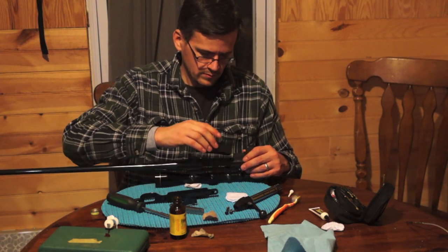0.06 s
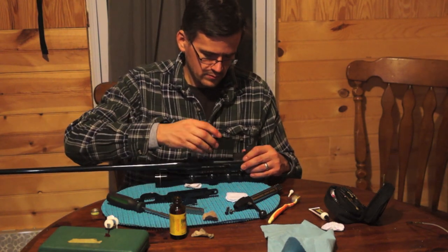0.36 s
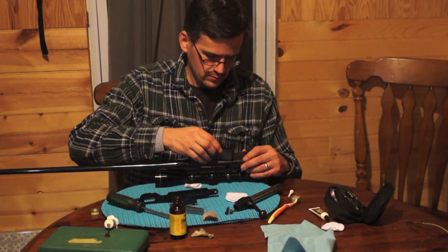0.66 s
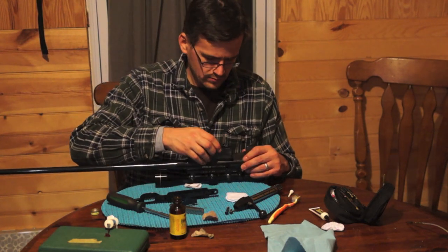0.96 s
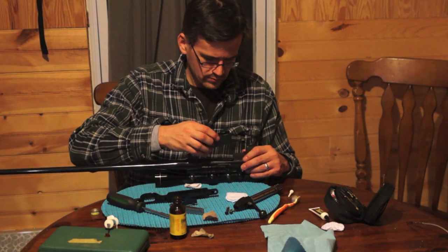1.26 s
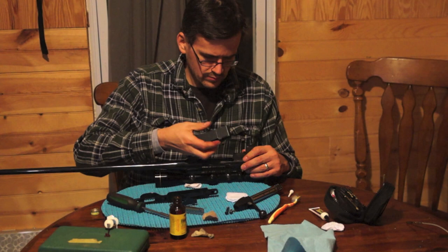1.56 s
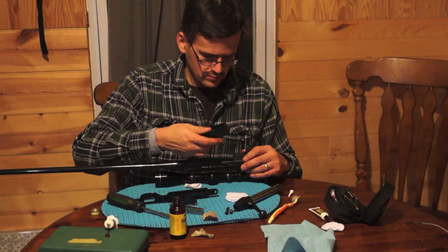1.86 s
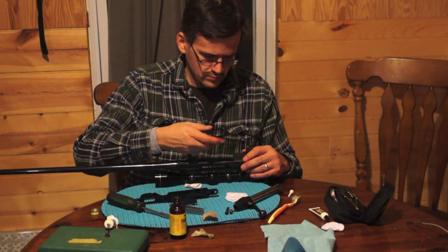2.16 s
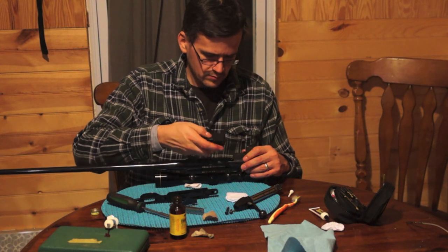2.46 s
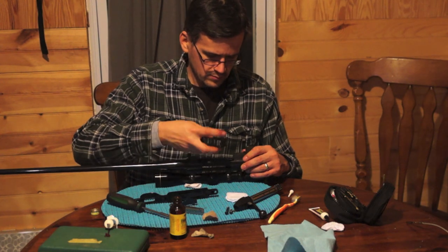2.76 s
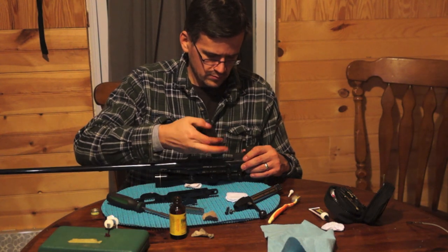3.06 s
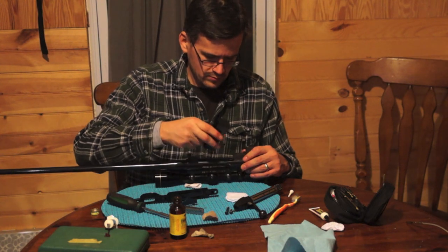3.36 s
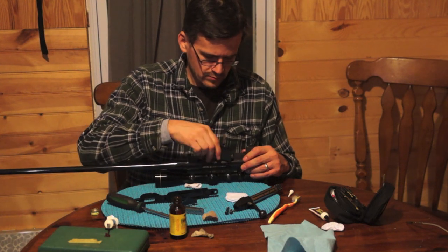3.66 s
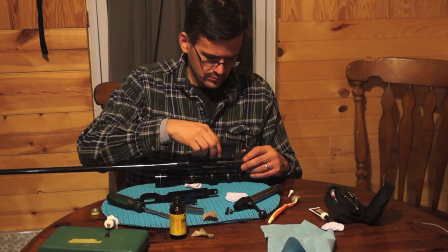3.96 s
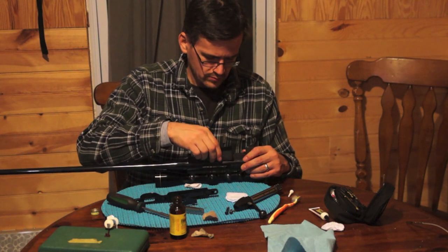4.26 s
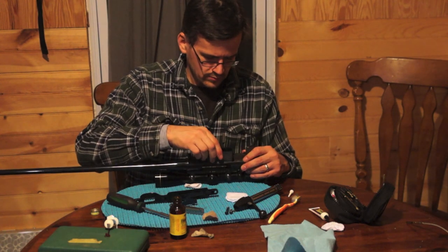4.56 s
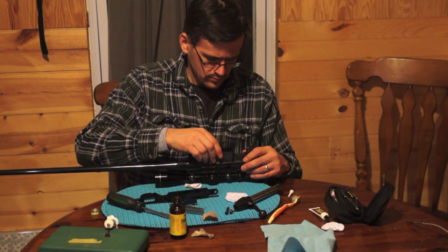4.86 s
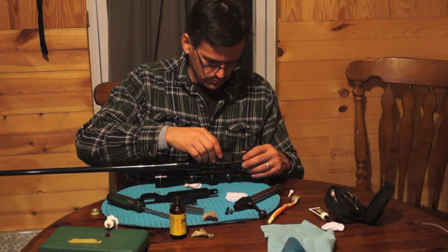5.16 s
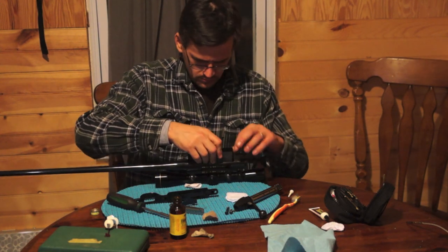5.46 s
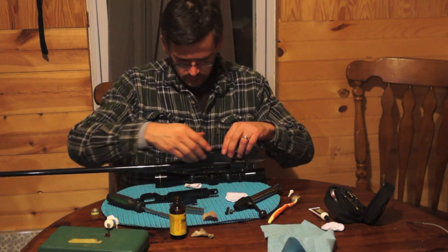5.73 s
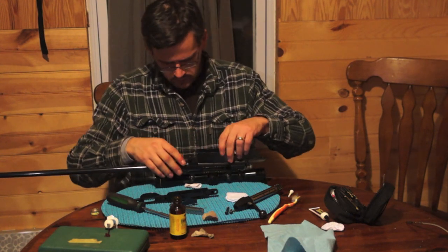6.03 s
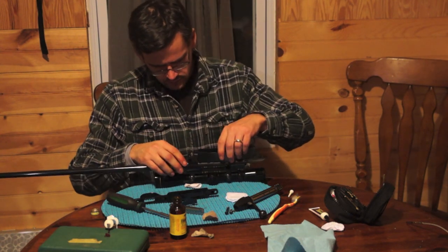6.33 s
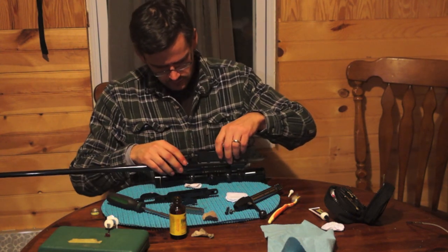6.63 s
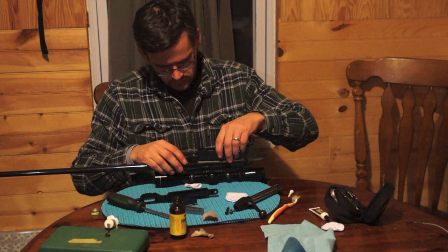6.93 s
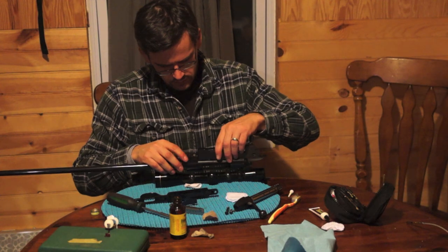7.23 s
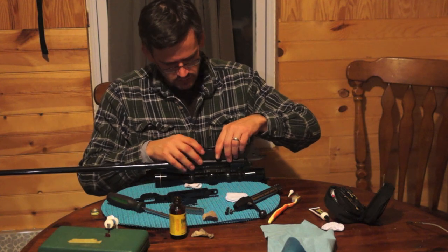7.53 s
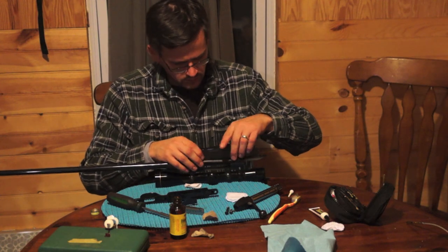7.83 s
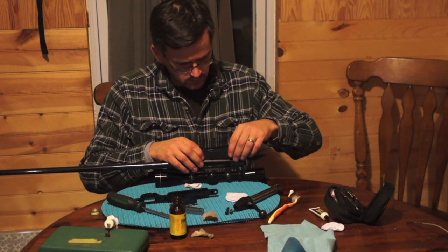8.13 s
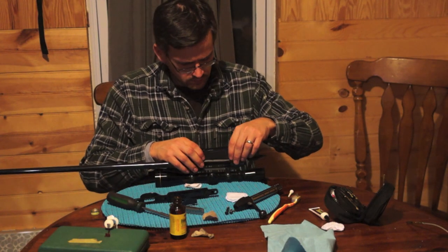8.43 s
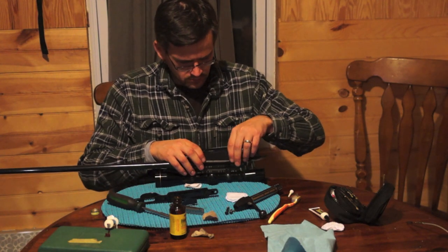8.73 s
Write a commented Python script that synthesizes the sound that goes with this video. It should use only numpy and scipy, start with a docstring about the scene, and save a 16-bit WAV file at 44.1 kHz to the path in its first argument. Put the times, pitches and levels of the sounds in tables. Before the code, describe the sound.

Small steel gun parts are handled and pressed into place, each contact clicking with a brief metallic ring. After an early click and some delicate rasps come the loudest clacks and a scrape, then scattered ticks, a bright snap and a final scrape and click. Shirt sleeves rustle softly in the later half. The sound is heard in stereo from a metre or two, in a small wooden room with low hum and hiss.

```python
"""Assembling a rifle at a table

Steel parts are fitted together in a small wood-panelled room. Each contact is a chatter of tiny
impacts that rings the receiver, carrier, catch or cover and rebounds once: light ones knock, hard
ones clack. A loose part slides in the fingers, steel scrapes home and flannel sleeves rustle.
A stereo microphone a metre or two away hears the walls answer, an appliance hum and its own hiss."""
import sys
import numpy as np
from scipy import signal
from scipy.fft import rfft, irfft
from scipy.io import wavfile

SR = 44100
rng = np.random.default_rng(int(sys.argv[2]) if len(sys.argv) > 2 else 0)


def waveform_to_disk(signal):
    """Save audio, clipped to [-1, 1], as 16-bit WAV at the path in sys.argv[1]."""
    frames = np.transpose(np.atleast_2d(signal))
    scaled = np.clip(frames, -1, 1) * 32767
    samples = np.round(scaled).astype(np.int16)
    wavfile.write(sys.argv[1], SR, samples)


N = 392225


def undb(db):
    """Decibels to gain."""
    return 10 ** (np.asarray(db) / 20)


def unit(x):
    """Scale to rms 1."""
    return x / np.sqrt(np.mean(x ** 2) + 1e-30)


def attack_rms(x):
    """Strength of the first 12 ms."""
    return np.sqrt(np.mean(x[:int(.012 * SR)] ** 2))


def freqs(x):
    """Frequency of each spectral bin of x, at least 1 Hz."""
    return np.maximum(np.fft.rfftfreq(x.shape[-1], 1 / SR), 1)


def lookup(points, hz):
    """Read (freq_hz, value) points on a log-frequency axis."""
    point_hz, value = np.transpose(points)
    return np.interp(np.log(hz), np.log(point_hz), value)


def colour(x, points):
    """Equalise x with a curve of (freq_hz, gain_db) points."""
    return irfft(rfft(x) * undb(lookup(points, freqs(x))), x.shape[-1])


def cut(x, hz, kind):
    """Causal Butterworth filter."""
    return signal.sosfilt(signal.butter(4, hz, kind, fs=SR, output="sos"), x)


def add(track, start_s, x):
    """Mix x into the track at start_s."""
    i = int(start_s * SR)
    track[i:i + len(x)] += x[:len(track) - i]


def wander(rate_hz):
    """Random drift with rms 1."""
    return unit(np.interp(np.arange(N) / SR * rate_hz, np.arange(1024), rng.standard_normal(1024)))


def decay(t, t60_s):
    """Envelope that falls 60 dB in t60_s."""
    return np.exp(-np.log(1000) * t / t60_s)


def grit(samples, grain_db):
    """Grainy noise: each sample has its own random level."""
    return rng.standard_normal(samples) * undb(grain_db * rng.standard_normal(samples))


def room_tone(air_mid_db=-57, air_side_db=-56, hum_side_db=-9):
    """Room air and microphone hiss, with the low hum of a running appliance."""
    # colour of the air and hiss, mid and side: freq_hz, gain_db
    air_mid = [(12, -52), (20, -19.5), (129, -5), (185, -6), (232, -3), (315, -11), (352, -10), (393, -11),
               (491, -13.5), (581, -14), (811, -16.5), (1010, -17.5), (2470, -21.5), (6360, -25),
               (15500, -30)]
    air_side = [(12, -58), (20, -28), (49, -30), (70, -23), (133, -19), (191, -9.5), (274, -5.5),
                (382, -2.5), (452, -4), (549, -1), (1770, -8), (6360, -20), (15500, -26)]
    # the appliance's narrow resonances: centre_hz, width_hz, level_db
    hum_bands = [(117, 7.4, -81.5), (144, 1.7, -74), (229, 17, -67.5), (252.2, 18, -71.5), (352.7, 17, -72)]
    mid = undb(air_mid_db) * unit(colour(rng.standard_normal(N), air_mid))
    side = undb(air_side_db) * unit(colour(rng.standard_normal(N), air_side))
    for centre_hz, width_hz, level_db in hum_bands:
        resonance = 1 / (1 + (2 * (freqs(mid) - centre_hz) / width_hz) ** 2)
        hum = undb(level_db) * unit(irfft(rfft(rng.standard_normal((2, N))) * resonance, N))
        mid += hum[0]
        side += undb(hum_side_db) * hum[1]
    return np.array([mid + side, mid - side])


def sleeves(rest_db=-69.5, swell_s=0.29):
    """Flannel rustles unevenly and swells with each move of the arms."""
    # colour of soft flannel: freq_hz, gain_db
    flannel = [(40, -19), (150, -2), (400, -3.5), (1000, -10.5), (3000, -23), (12000, -40)]
    # moves of the arms: peak_s, level_db
    arm_moves = [(4.5, -72), (5.75, -61), (7.2, -61.5), (7.9, -62.5), (8.5, -64.5)]
    t = np.arange(N) / SR
    swells = sum(undb(db) ** 2 * np.exp(-((t - peak_s) / swell_s) ** 2) for peak_s, db in arm_moves)
    rustle = unit(colour(rng.standard_normal((2, N)), flannel))
    return rustle * np.sqrt(undb(rest_db) ** 2 + swells) * undb(wander(12))


def ring(modes, t, scatter_db=0.9):
    """Decaying modes; every blow lands on another spot and weights them anew."""
    pitch_hz, gain_db, t60_s = np.transpose(modes)[:, :, None]
    gain = undb(gain_db + scatter_db * rng.standard_normal(pitch_hz.shape))
    phase = rng.random(pitch_hz.shape)
    return np.sum(gain * np.sin(2 * np.pi * (pitch_hz * t + phase)) * decay(t, t60_s), axis=0)


def finger_slides(slide_s=0.044, grain_db=5, rasp_db=-4):
    """Skin slips over a loose steel part, rasping and making it sing faintly."""
    # shifts in the fingers: start_s, level_db
    slides = [(1.622, -68), (2.21, -62), (2.38, -68), (2.586, -64.5), (2.74, -70), (2.975, -68)]
    # the loose part's modes: pitch_hz, gain_db, t60_s
    loose_modes = [(6190, 0, .08), (6850, -0.5, 0.1), (8030, -2, .1), (8950, 2, 0.07), (9500, 2, 0.051),
                   (10200, -5, .1), (10750, -6, .1), (11300, 0, 0.097), (12900, -1, 0.1)]
    out, t = np.zeros(N), np.arange(SR // 3) / SR
    stroke = np.sin(np.pi * np.minimum(t / slide_s, 1))
    length_gain = np.sqrt(slide_s / t[-1])  # sets the level over the stroke's length
    for start_s, level_db in slides:
        slips = grit(len(t), grain_db) * stroke
        singing = unit(signal.fftconvolve(slips, ring(loose_modes, t))[:len(t)])
        rasp = undb(rasp_db) * unit(cut(slips, 4000, "highpass"))
        add(out, start_s, undb(level_db) * length_gain * (singing + rasp))
    return out


def light_touches():
    """Each light touch wakes a single resonance: a faint ping."""
    # pings: start_s, pitch_hz, level_db, t60_s
    touches = [(1.51, 924, -61.5, 0.72), (1.595, 3230, -57, 0.078), (1.642, 4215, -59, .09),
               (2.236, 1450, -52.5, 0.05), (3.868, 6220, -57, 0.05), (6.598, 1090, -44.5, 0.067),
               (8.489, 715, -47.5, 0.052)]
    out, t = np.zeros(N), np.arange(SR // 3) / SR
    for start_s, pitch_hz, level_db, t60_s in touches:
        add(out, start_s, undb(level_db) * np.sin(2 * np.pi * pitch_hz * t) * decay(t, t60_s))
    return out


def scrape(trim_db=-5, grain_db=6, snag_db=3):
    """Dense stick-slip as steel drags along its seat; each push swells and fades."""
    # colour of dragging steel: freq_hz, gain_db
    drag_colour = [(200, -31), (700, 1), (1200, -2), (1750, 11), (2400, 3), (2900, 4), (4200, -1),
                   (7000, -4), (15000, -24)]
    # pushes home: start_s, length_s, level_db (before the trim)
    pushes = [(4.42, 0.071, -65), (4.54, 0.26, -52.5), (6.8, 0.08, -62), (7.362, 0.025, -52),
              (7.656, 0.046, -63), (8.749, 0.067, -47)]
    slips = unit(colour(grit(N, grain_db), drag_colour))
    pressure = np.zeros(N)
    for start_s, length_s, level_db in pushes:
        add(pressure, start_s, undb(level_db) * np.sqrt(np.hanning(int(length_s * SR))))
    return undb(trim_db) * slips * pressure * undb(snag_db * wander(110))


def contact(part, clack_db, ring_db, knock_db, tick_db, chatter_s,
            grain_db=5, body_db=-18, body_s=0.012, knock_hz=2200, tick_hz=5600):
    """Steel meets steel: tiny impacts die away, the gun's body and the struck part ring on."""
    # dense, quickly damped response of the whole gun: freq_hz, gain_db
    gun_body = [(100, -6), (300, -7.5), (500, -4), (700, -4.5), (1000, -0.5), (1400, -3), (2000, -3),
                (3300, 3), (4300, 4.5), (5600, -6.5), (8000, 2), (10000, -1), (12000, -9), (16000, -18)]
    # modes of each part, by name: pitch_hz, gain_db, t60_s
    part_modes = { "receiver": [(1745, -18.5, 0.22), (1978, -14.5, 0.16), (2362, -22.5, 0.17),
                  (2920, -35, .13), (3624, 7, 0.04), (3584, 4, 0.06), (3820, -3, 0.039), (4043, -2, 0.035),
                  (4200, -2, 0.041), (5140, -36, 0.11), (6224, -8, 0.045), (6220, -5, 0.11),
                  (6630, -12, .06), (7850, -10, 0.091), (7860, -14, 0.084), (8689, -9, 0.087),
                  (9810, -9.5, 0.083), (10000, -15, 0.09), (12630, -30, .07)], "carrier": [(1965, -8, .15),
                  (2160, -4, .07), (2420, -27, .07), (2820, -16, 0.085), (3190, -4, 0.047),
                  (4160, 11, 0.025), (4100, -3, 0.062), (4170, -2, 0.084), (4660, 2, 0.07),
                  (6130, -1, 0.057), (6300, 5, .09), (6870, 2, .07), (7860, 5, 0.082), (11830, 2, 0.081)],
                  "catch": [(373, -10.5, 0.03), (990, -10.5, 0.03), (2750, -9.5, 0.046), (3056, -9, 0.066),
                  (3540, -1.5, 0.035), (4520, -9, .1), (4626, -9, 0.088), (4660, 2.5, 0.057),
                  (4930, -4, .1), (6300, -1.5, 0.068), (6450, -9, 0.11), (8140, -24, 0.055),
                  (10580, -10, 0.046), (12700, -7, .025), (14700, -7, .01)], "cover": [(1050, -4, 0.048),
                  (1642, -5.5, 0.054), (1803, -9, 0.037), (2100, -17, 0.066), (2330, -20, 0.06),
                  (2890, -4, 0.027), (3138, 1, 0.025), (3273, 4.5, 0.03), (3424, -1, 0.041),
                  (4220, -5.5, .04), (4400, -21, 0.036), (5360, -4.5, 0.056), (6600, 4.5, 0.047),
                  (8120, -6, .05)]}
    t = np.arange(SR // 3) / SR
    impacts = rng.standard_normal(len(t)) * undb(grain_db * np.clip(rng.standard_normal(len(t)), -2, 2))
    envelope = np.exp(-t / chatter_s) + undb(body_db) * np.exp(-t / body_s)
    crack = colour(impacts * envelope, gun_body) * (1 - t / t[-1])
    tone = ring(part_modes[part], t)
    attack = 1 - np.exp(-t / (0.49 * chatter_s))
    hit = (crack / attack_rms(crack) + undb(ring_db) * tone / attack_rms(tone)) * attack
    # a heavy push knocks, a sharp edge ticks; both are set against the clack
    knock = cut(hit, knock_hz, "lowpass")
    clack = cut(hit, [knock_hz, tick_hz], "bandpass")
    tick = cut(hit, tick_hz, "highpass")
    bands = (knock, knock_db), (clack, 0), (tick, tick_db)
    balanced = sum(undb(clack_db + db) * band / attack_rms(band) for band, db in bands)
    return cut(balanced, 155, "highpass")  # small parts radiate no bass


def seating_parts(trim_db=-3, middling_db=-46, loose_s=0.0021, rebound_s=0.0075, seat_damping_db=10):
    """Parts click into place and rebound once; a longer chatter means a looser fit."""
    # contacts, often a lead-in tick and then the seating blow: start_s, part, clack_db (before the
    # trim), ring_db (against the crack), tick_db (against the clack), chatter_s
    contacts = [ (1.2694, "carrier", -43.5, -16, -16, 0.0045), (1.2958, "carrier", -33.5, -3, -7, 0.0017),
                (1.642, "carrier", -67, -8, -12, .003), (4.2171, "receiver", -30, 5.5, -15.5, 0.00026),
                (4.2434, "receiver", -25, -1.5, -3, 0.0011), (4.313, "cover", -48, 7, -8, 0.0012),
                (4.422, "receiver", -48.5, -1, -5.5, 0.0029), (4.5248, "receiver", -41, 6, -5.5, 0.00098),
                (4.542, "receiver", -36, -2, -7, 0.0016), (4.6807, "receiver", -47.5, -4, -2.5, .0018),
                (4.7018, "cover", -41.5, -10.5, -6.5, 0.0035), (4.8125, "cover", -54, -6, -11, .0007),
                (4.893, "cover", -33.5, -7.5, -9, 0.003), (5.598, "receiver", -50, -4, -15, 0.0037),
                (5.802, "cover", -49, -13, -8, .0011), (6.219, "receiver", -58.5, -9, -5, .0013),
                (6.2504, "cover", -57.5, -10, -15, 0.0056), (6.597, "carrier", -49.5, -2, -5.5, .0021),
                (6.7077, "carrier", -46, -8.5, -11.5, 0.0044), (7.089, "carrier", -58.5, -15, -9, 0.0048),
                (7.3775, "catch", -35, 4, 2.5, .0031), (8.407, "receiver", -52.5, -4, -4, 0.0039),
                (8.428, "cover", -49.5, -3, -16, 0.0037), (8.4874, "cover", -55, -19, -6, 0.0017),
                (8.5283, "cover", -39.5, -7, -10.5, 0.00042), (8.7736, "cover", -36, -1, -7, 0.002)]
    out = np.zeros(N)
    for start_s, part, clack_db, ring_db, tick_db, chatter_s in contacts:
        looseness = np.log2(chatter_s / loose_s)
        knock_db = -4.5 - 0.34 * (clack_db - middling_db) + 1.5 * looseness  # hard, snug: less knock
        add(out, start_s, contact(part, clack_db, ring_db, knock_db, tick_db, chatter_s))
        # a looser part rebounds harder; its seat damps the ring as it falls back
        rebound_db = clack_db - 10.5 + 3.5 * looseness
        rebound = contact(part, rebound_db, ring_db - seat_damping_db, knock_db, tick_db, chatter_s)
        add(out, start_s + rebound_s, rebound)
    return undb(trim_db) * out


def room(dry, onset_s=0.00044, table_db=-9, table_s=0.00167,
         wall_db=-11, wall_s=0.0066, wall_spread_s=0.0025, left_db=2):
    """Direct sound, a bounce off the table, a cluster from the near walls and a short diffuse tail."""
    # decay of the panelled room: freq_hz, t60_s
    reverb_times = [(300, 0.74), (1000, 0.44), (2800, 0.3031), (7000, 0.1959), (15000, 0.25)]
    # stereo width of the reflections: freq_hz, side_gain_db
    width = [(150, -17), (400, -11), (800, -10), (1400, -3.5), (2500, -3.5), (4500, -4), (8000, -1),
             (15000, -1)]
    t = np.arange(int(.4 * SR)) / SR
    spectrum, tail = rfft(rng.standard_normal((2, len(t)))), 0
    edges_hz = np.r_[0, np.geomspace(300, SR / 2, 9)]
    for lo, hi in zip(edges_hz, edges_hz[1:]):
        band = irfft(spectrum * ((freqs(t) >= lo) & (freqs(t) < hi)), len(t))
        tail = tail + band * decay(t, lookup(reverb_times, (lo + hi) / 2))
    tail *= 1 - np.exp(-t / onset_s)
    walls = rng.standard_normal((2, len(t))) * np.exp(-((t - wall_s) / wall_spread_s) ** 2)
    mid, side = (unit(tail) + undb(wall_db) * unit(walls)) / np.sqrt(len(t))
    mid[int(table_s * SR)] += undb(table_db)
    side = colour(side, width) * (1 - t / t[-1])
    response = np.array([mid + side, mid - side])
    response[:, 0] += undb([left_db / 2, -left_db / 2])  # direct sound, a little to the left
    return signal.fftconvolve(dry[None], response, axes=1)[:, :N]


def scene():
    """The steelwork sounds in the room, over a bed of room tone and sleeves."""
    steel = seating_parts() + scrape() + finger_slides() + light_touches()
    return room(steel) + room_tone() + sleeves()


def record(dry):
    """A steep low-pass cuts the top above 15850 Hz."""
    return signal.sosfilt(signal.ellip(10, .2, 70, 15850, fs=SR, output="sos"), dry)


dry = scene()
out = record(dry)
waveform_to_disk(out)
```